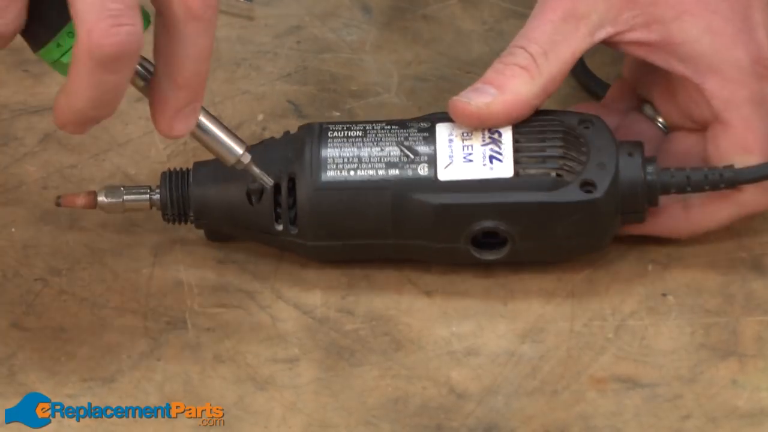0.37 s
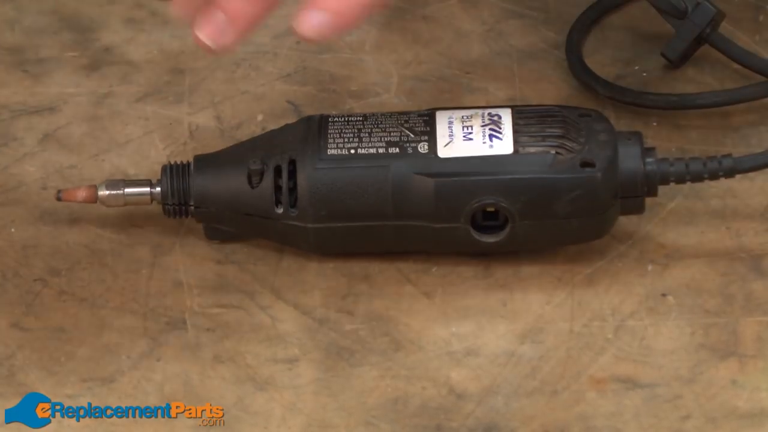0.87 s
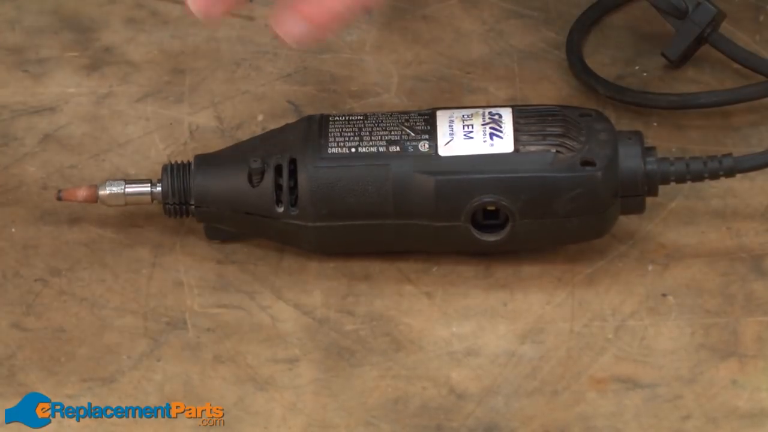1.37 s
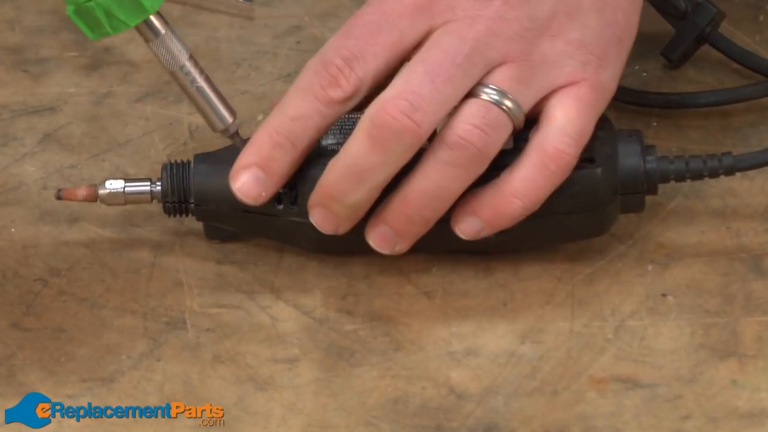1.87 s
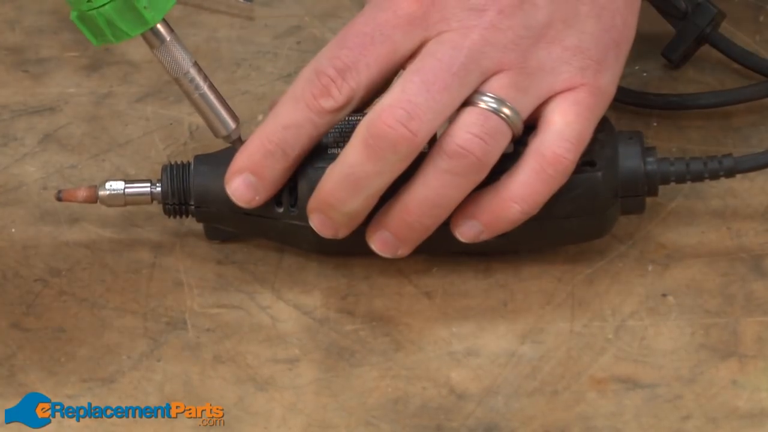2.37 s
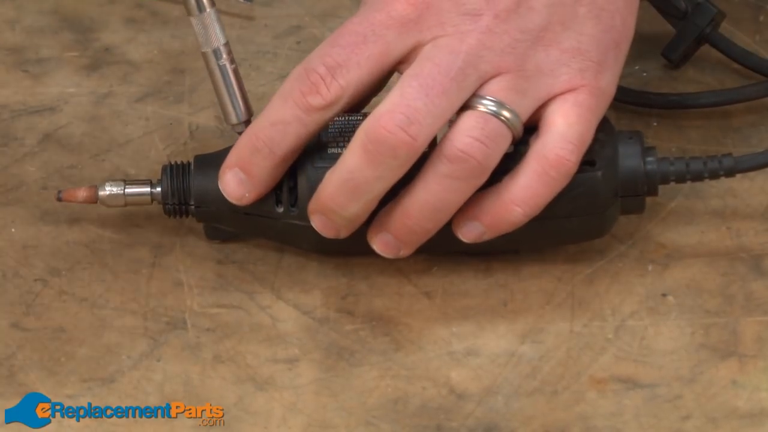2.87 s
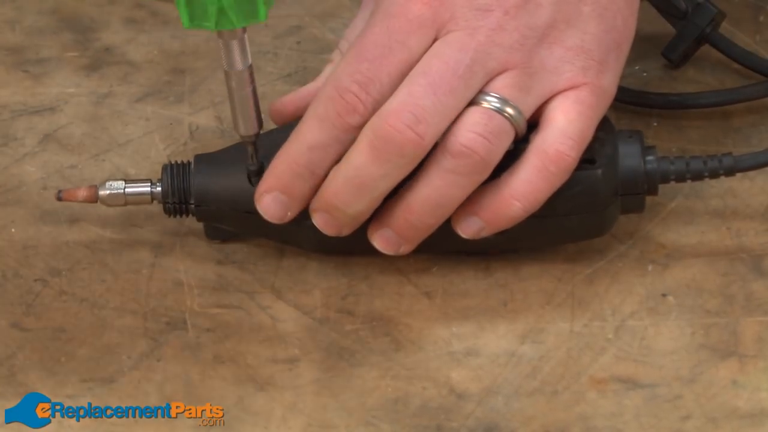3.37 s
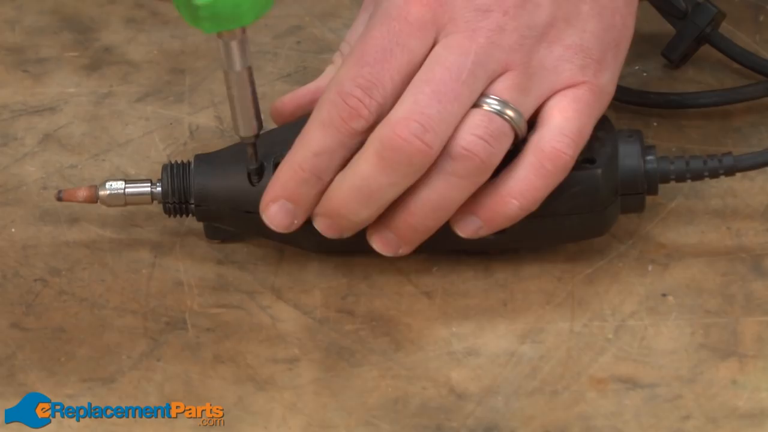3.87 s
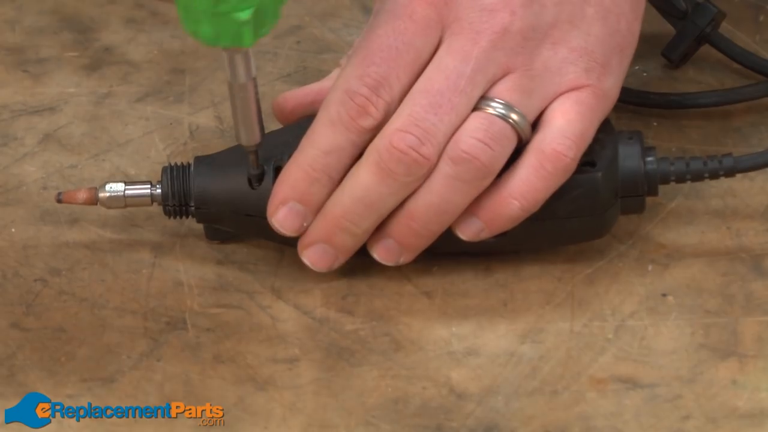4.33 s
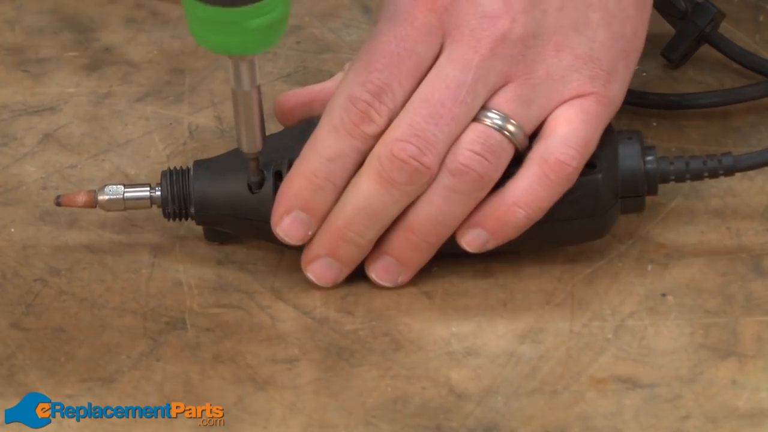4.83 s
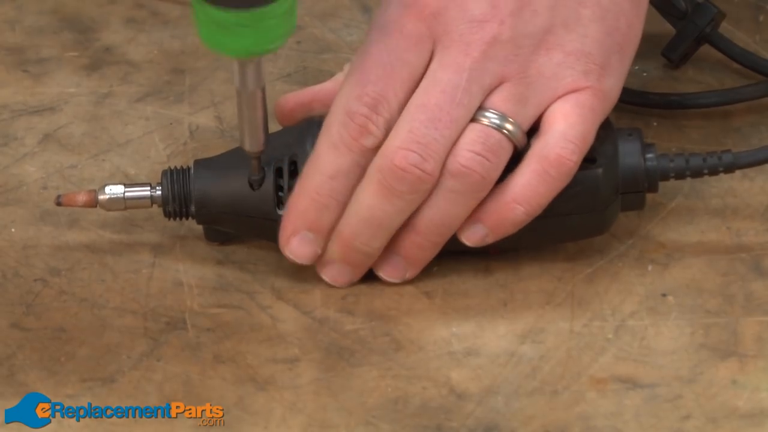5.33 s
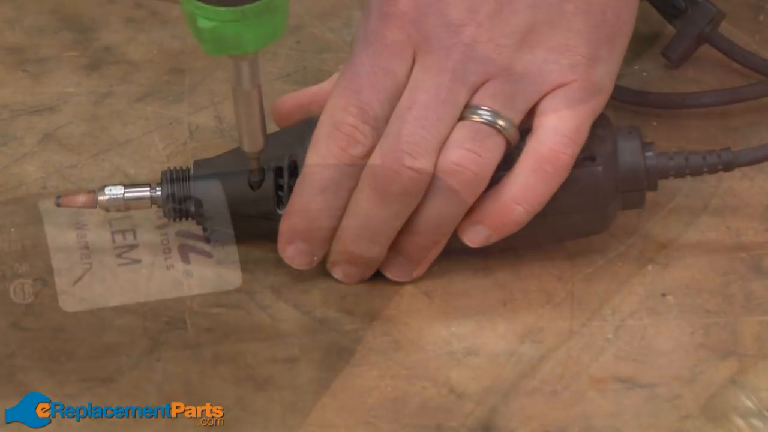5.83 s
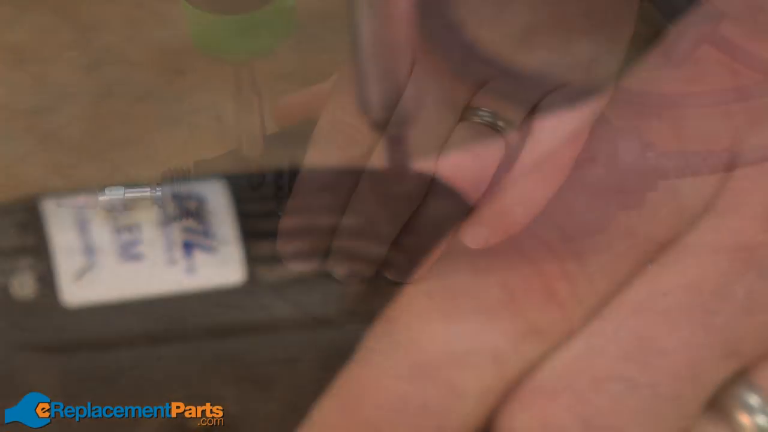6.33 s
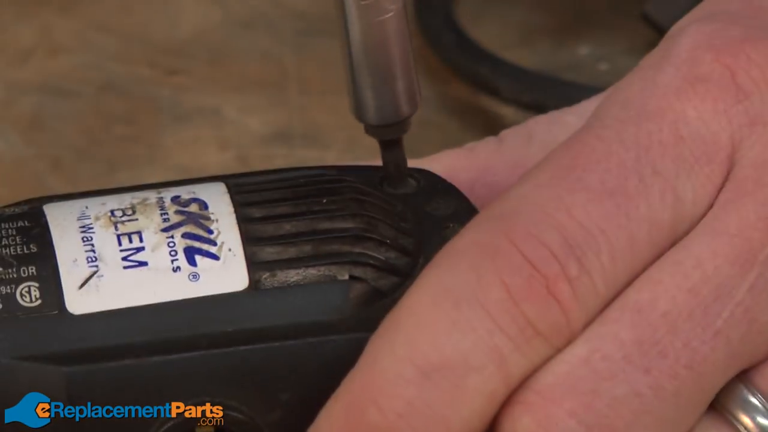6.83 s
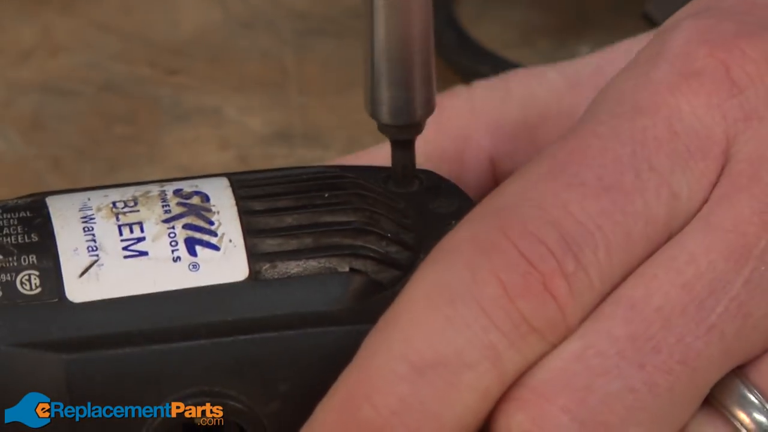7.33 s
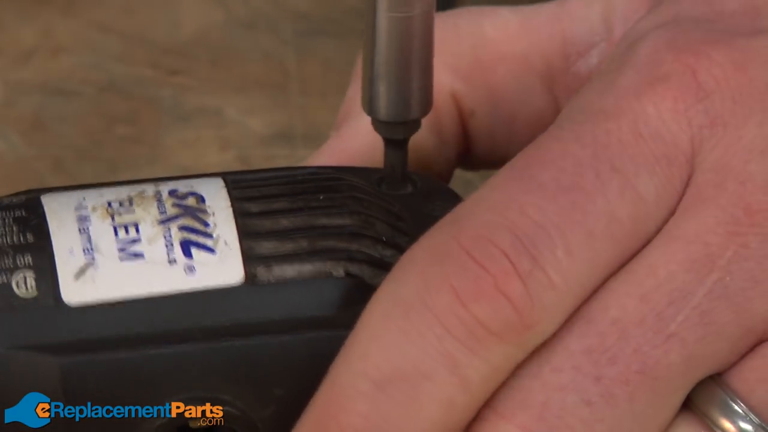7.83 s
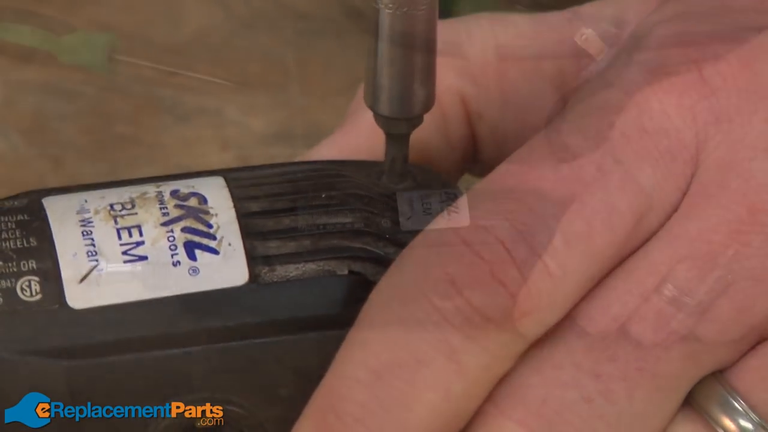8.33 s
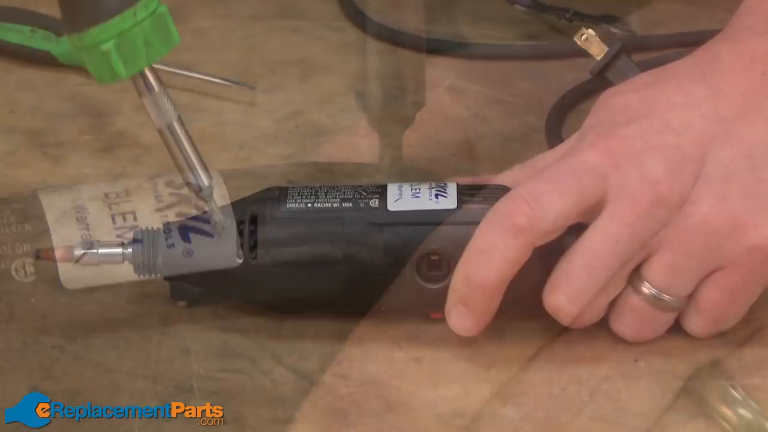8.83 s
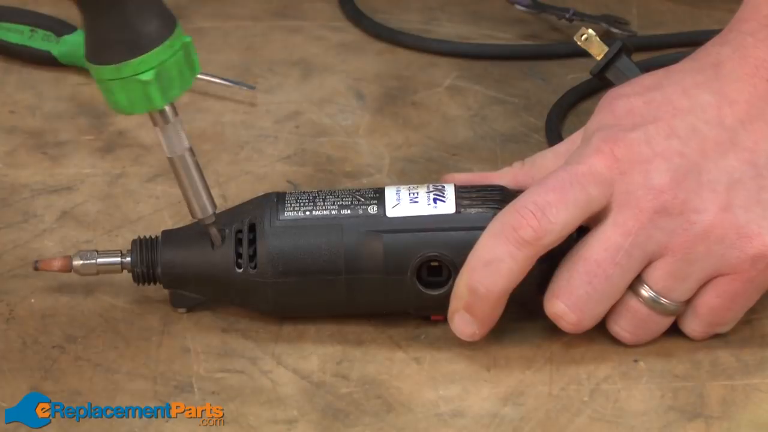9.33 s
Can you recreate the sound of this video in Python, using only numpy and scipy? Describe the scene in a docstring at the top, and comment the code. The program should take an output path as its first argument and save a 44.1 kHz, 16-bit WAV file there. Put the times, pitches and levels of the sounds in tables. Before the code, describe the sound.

Quiet handling of a plastic tool on a hollow bench, then a hand screwdriver ticking, rubbing and thudding in short wrist turns.

```python
"""Faint creaks and a few low thumps over mains hum and hiss, then, from about four seconds, busy screwdriving.
A hand screwdriver turns small screws into a plastic tool housing on a hollow workbench in a small room.
Blows ring decaying modes of bit, shell or bench top; rubbing and scraping are dense grains of such blows.
Creaks are stick-slip noise bursts, the room is sparse echoes; a single microphone hears it all."""
import sys
import numpy as np
from scipy import signal
from scipy.fft import rfft, irfft
from scipy.io import wavfile
from scipy.ndimage import uniform_filter1d

SR = 44100
rng = np.random.default_rng(int(sys.argv[2]) if len(sys.argv) > 2 else 0)


def unload_audio(sound):
    """Save the sound as a 16-bit wav file, at the path given as the first command line argument."""
    columns = np.transpose(np.atleast_2d(sound))
    # keep every value between -1 and 1, then stretch to whole-number steps
    steps = np.round(np.clip(columns, -1, 1) * 32767)
    wavfile.write(sys.argv[1], SR, steps.astype(np.int16))


def volts_from_db(level):
    """Convert decibel levels to linear amplitude ratios."""
    exponent = np.asarray(level, float) / 20
    return 10 ** exponent


N = 426888

# Modes of the hollow bench top. Each row: frequency in Hz, level in dB, t60 in seconds.
BENCH_MODES = [(92.8, -14, 0.4), (128.1, 2.5, 0.084), (149.96, -12.5, 0.41), (194.3, -11.5, 0.18),
               (246.7, -1, 0.062), (275.7, -12.5, 0.096), (371.7, -10, 0.12), (455.4, -17.5, 0.35),
               (512.7, -13, 0.071), (694.8, -14, 0.15)]
# Modes of the plastic housing. Each row: frequency in Hz, level in dB, t60 in seconds.
SHELL_MODES = [(775, -13, .012), (946, -6, 0.014), (1215, 16, 0.006), (1618, 15.5, 0.0051),
               (1840, -1.5, 0.029), (2138, 8, 0.015), (2527, 6.5, 0.017), (2798, 1.5, 0.024),
               (3230, -4.5, 0.02)]
# Modes of the steel bit. Each row: frequency in Hz, level in dB, t60 in seconds.
BIT_MODES = [(4040, 0, 0.0088), (4870, 13, 0.0018), (5990, 10.5, 0.003), (7110, 5, 0.0065),
             (8640, -0.5, 0.0073), (9600, -11, 0.009), (10900, -7, 0.009), (14300, -60, 0.0013)]
# Where both hisses break off at the top. The row: frequency in Hz, level in dB.
HISS_EDGE = [(13700 * 1.01, -90)]


def evened(x):
    """Scales to rms 1."""
    return x / np.sqrt(np.mean(x ** 2) + 1e-20)


def read(points, hz):
    """Reads a table on a log-frequency axis."""
    f, value = np.transpose(points)
    return np.interp(np.log(hz + 1), np.log(f + 1), value)


def add(mix, s, sound):
    """Mixes a sound in at a time in seconds."""
    part = mix[round(s * SR):][:len(sound)]
    part += sound[:len(part)]


def colour(x, points):
    """Filters by a spectrum table of Hz and dB."""
    gain = volts_from_db(read(points, np.fft.rfftfreq(len(x), 1 / SR)))
    return irfft(rfft(x) * gain, len(x))


def ring(modes, seconds, near_hz, reach, contact_s, chatter):
    """A touch and short chatter ring the modes nearest a pitch (reach in octaves); peak 1."""
    # each mode is a cluster of three close ones
    hz, db, t60 = np.repeat(modes, 3, axis=0).T[:, :, None]
    t = np.arange(round(seconds * SR)) / SR
    db = db - 6 * (np.log2(hz / near_hz) / reach) ** 2
    grip = 1 + .04 * rng.standard_normal(hz.shape)  # the changing grip shifts each mode a little
    decaying = volts_from_db(db - 60 * t / t60) * np.sin(2 * np.pi * hz * grip * t)
    rise = 1 - np.exp(-t * near_hz * 1.13)  # the force builds over about a cycle
    contact = chatter * np.exp(-t[:1024] / contact_s) * rng.standard_normal(1024)
    contact[0] = 1  # the first touch
    sound = signal.fftconvolve(rise * decaying.sum(0), contact)[:len(t)]
    return sound / abs(sound).max()


def grains(modes, near_hz, reach, per_s, spread_db, contact_s, seconds, count=8):
    """Dense random contacts of uneven size, each kind ringing the modes its own way; rms 1."""
    happens = rng.random(N) < per_s / SR
    size = volts_from_db(spread_db * np.minimum(rng.exponential(1, N), 4)) * happens
    kind = rng.integers(0, count, N)
    out = np.zeros(N)
    for k in range(count):
        blow = ring(modes, seconds, near_hz, reach, contact_s, 0.5)
        out += signal.oaconvolve(size * (kind == k), blow)[:N]
    return evened(out)


def ticks():
    """The bit meets a screw head: millisecond steel clicks that also stir the shell."""
    # Each row: start in seconds, peak of the steel click in dB, brightest pitch in Hz.
    head_hits = [(0.2783, -43.5, 7000), (1.1328, -44.5, 7290), (2.8646, -39, 6330), (3.525, -43.5, 4730),
                 (3.7088, -39.5, 5830), (3.9657, -39.5, 6240), (4.0706, -37, 5550), (4.2265, -47, 5760),
                 (4.2562, -35, 6100), (4.2893, -22, 6700), (4.326, -35, 4640), (4.418, -34.5, 6400),
                 (4.4458, -35, 7020), (4.4577, -31, 5830), (4.4926, -31.5, 5500), (4.541, -37.5, 6800),
                 (4.6206, -32.5, 6970), (4.633, -32, 7250), (4.6879, -34, 4500), (4.6929, -33, 4670),
                 (4.792, -26.5, 6700), (4.8418, -32.5, 5860), (4.8631, -31, 6800), (4.9033, -30, 6400),
                 (4.9454, -29.5, 7100), (4.9832, -24.5, 7600), (4.989, -28, 7800), (5.058, -31, 6900),
                 (5.1018, -25, 7800), (5.1155, -25, 6400), (5.1409, -20, 6600), (5.1981, -41, 5900),
                 (5.2316, -32, 7100), (5.2902, -30.5, 6740), (5.3264, -36.5, 4540), (5.3349, -38, 7000),
                 (5.3895, -31, 7500), (5.3931, -27.5, 6300), (5.4284, -23.5, 5710), (5.4366, -26, 7560),
                 (5.573, -46, 6100), (5.622, -45, 4580), (5.67, -37, 5770), (5.6772, -35.5, 6270),
                 (5.7013, -32.5, 6650), (5.7142, -34, 7050), (5.77, -42, 6150), (5.8186, -37, 6900),
                 (5.8733, -37.5, 7290), (5.9579, -48, 5960), (6.0437, -33.5, 7700), (6.0821, -27.5, 7550),
                 (6.155, -34, 7400), (6.1969, -31, 5000), (6.239, -40, 7340), (6.246, -34, 7200),
                 (6.301, -39, 6100), (6.315, -40, 6660), (6.3858, -34, 5630), (6.4908, -38.5, 7300),
                 (6.5292, -37.5, 5000), (6.6932, -29.5, 4500), (6.7034, -38, 8170), (6.7232, -31, 5400),
                 (6.7456, -39, 7000), (6.7865, -42, 4820), (6.7964, -36, 5700), (6.994, -37, 7300),
                 (7.0175, -32.5, 5300), (7.0268, -31, 4870), (7.0494, -26.5, 5900), (7.0696, -24, 7200),
                 (7.083, -27, 6740), (7.092, -33, 6000), (7.1165, -26, 7700), (7.2763, -33.5, 6900),
                 (7.3383, -32, 5200), (7.3727, -33, 7450), (7.519, -34, 5070), (7.5948, -39.5, 7360),
                 (7.6136, -42, 7540), (7.8182, -34, 7500), (7.9343, -35, 6600), (8.6158, -43, 10500),
                 (9.109, -41, 5990), (9.317, -23, 9150), (9.5214, -38, 8750), (9.5836, -38, 9000)]
    out = np.zeros(N)
    for s, db, hz in head_hits:
        add(out, s, volts_from_db(db) * ring(BIT_MODES, .024, hz, .45, .0003, .3))
        add(out, s, volts_from_db(db - 12) * ring(SHELL_MODES, .024, 2860, 0.79, 0.00042, 0.27))
    return out


def knocks():
    """The bit or a finger knocks the shell: a duller, longer ring near one pitch, with a broad thud."""
    # Each row: start in seconds, peak of the ring in dB, strongest pitch in Hz.
    shell_hits = [(0.32, -46, 1460), (1.434, -49.5, 1170), (1.46, -66, 1360), (2.042, -51.5, 1330),
                  (2.921, -46.5, 1260), (2.925, -55, 2310), (3.027, -55, 1980), (3.076, -60, 2140),
                  (3.163, -56, 1310), (3.508, -43, 1300), (3.522, -33.5, 1180), (4.0043, -42, 1500),
                  (4.3273, -40, 2480), (4.6325, -41, 2680), (4.6925, -39, 3230), (4.877, -55, 3540),
                  (4.9515, -52, 1150), (5.063, -51, 1290), (5.2525, -51, 1180), (5.3348, -50, 1260),
                  (5.7432, -38, 3250), (6.0434, -30, 2950), (6.3547, -27.5, 2890), (6.4691, -50, 2500),
                  (6.6278, -49.5, 2330), (6.665, -51, 1960), (6.6931, -35, 2420), (6.7224, -25, 3550),
                  (6.7335, -26.5, 2920), (6.7537, -29.5, 1770), (7.0261, -53, 1490), (7.0513, -23, 3320),
                  (7.0563, -26, 2760), (7.0923, -24, 3380), (7.331, -43.5, 2420), (7.3632, -40.5, 2860),
                  (7.4863, -54, 2720), (7.5132, -35.5, 2260), (7.5265, -39.5, 1500), (8.0184, -44, 1000),
                  (8.439, -45.5, 1010), (8.6463, -28.5, 2430), (9.0255, -45, 1800), (9.082, -47.5, 1710),
                  (9.1073, -47, 1880), (9.2218, -46.5, 2070), (9.5222, -39, 1650), (9.5843, -41.5, 2300)]
    # Dull noise of a knock at 2500 Hz. Each row: frequency in Hz, level in dB per Hz.
    thud_colour = [(250, -27), (600, 3.5), (1500, -0.5), (3200, -11.5), (5000, -12.5), (12000, -33)]
    thud_db, growth = -52, 0.98  # level under a -35 dB knock, and dB gained per dB of blow
    out, t = np.zeros(N), np.arange(round(.12 * SR)) / SR
    for s, db, hz in shell_hits:
        add(out, s, volts_from_db(db) * ring(SHELL_MODES, .06, hz, .25, 0.0018, 0.15))
        moved = [(f * (hz / 2500) ** 0.14, g) for f, g in thud_colour]  # moves with the pitch
        thud = evened(colour(rng.standard_normal(len(t)), moved))
        thud = thud * volts_from_db(-60 * t / 0.13)  # t60 in s
        add(out, s, volts_from_db(thud_db + growth * (db + 35)) * thud)
    return out


def thumps():
    """The housing knocks the bench: a soft push rings the top; a high-pass keeps the deepest bass lean."""
    # Each row: start in seconds, peak in dB ahead of the bass filters, strongest pitch in Hz.
    bench_hits = [(0.073, -50, 110), (0.126, -37, 127), (0.316, -19.5, 143), (0.359, -28.5, 159),
                  (2.04, -32, 126), (2.98, -38, 99), (3.026, -30.5, 112), (3.154, -36.5, 118),
                  (3.507, -33, 167), (3.516, -16.5, 111), (3.729, -40, 117), (3.998, -34, 94),
                  (4.184, -40, 127), (4.302, -34.5, 140), (4.435, -33.5, 100), (4.599, -32, 91),
                  (4.827, -29.5, 122), (4.909, -33.5, 267), (5.064, -30.5, 118), (5.25, -35, 260),
                  (5.425, -26, 131), (5.581, -35.5, 127), (5.674, -30, 133), (5.901, -29.5, 130),
                  (6.044, -29, 118), (6.07, -14.5, 122), (6.259, -35.5, 134), (6.386, -14, 127),
                  (6.471, -24.5, 141), (6.722, -19.5, 123), (6.76, -10.5, 150), (7.05, -14, 129),
                  (7.095, -8, 147), (7.17, -44, 148), (7.296, -24, 137), (7.516, -27.5, 276),
                  (7.681, -29, 145), (7.728, -23.5, 145), (8.034, -23, 145), (8.074, -22.5, 133),
                  (8.325, -38, 143), (8.454, -39.5, 137), (8.647, -29.5, 111), (9.031, -34.5, 237),
                  (9.104, -28, 157), (9.315, -27.5, 98), (9.52, -26, 118)]
    out, t = np.zeros(N), np.arange(round(.4 * SR)) / SR
    hz, db, t60 = np.transpose(BENCH_MODES)[:, :, None]
    push = np.hanning(round(0.0016 * SR))
    for s, peak_db, near_hz in bench_hits:
        # each landing spot weighs and tunes the modes anew
        weight_spot, pitch_spot = rng.standard_normal((2, len(BENCH_MODES), 1))
        weight_db = db + 3.4 * weight_spot - 6 * (np.log2(hz / near_hz) / 1.46) ** 2
        decaying = volts_from_db(weight_db - 60 * t / t60) * np.sin(2 * np.pi * hz * (1 + 0.017 * pitch_spot) * t)
        boom = np.convolve(decaying.sum(0), push)
        add(out, s, volts_from_db(peak_db) * boom / abs(boom).max())
    sway = signal.sosfilt(signal.butter(2, 50, "low", fs=SR, output="sos"), out)
    lean = signal.sosfilt(signal.butter(4, 88, "high", fs=SR, output="sos"), out)
    return lean + volts_from_db(-20) * sway  # the bench legs sway under a thump


def turns():
    """Turns of the wrist: returns the rubbing and scraping gains and how far each turn is engaged."""
    # Each row: start in seconds, length in seconds, rubbing on the shell in dB,
    # steel scraping in dB above or below the rubbing.
    twists = [(3.967, 0.18, -68, 8), (4.16, 0.37, -63, 5), (4.415, 0.15, -59, 1), (4.565, 0.2, -58, -5),
              (4.793, 0.3, -61, -5), (5.05, 0.3, -59, -11), (5.238, 0.31, -63, -1),
              (5.368, 0.21, -59, 10.5), (5.537, 0.56, -62, 0.5), (5.89, 0.37, -65.5, 3.5),
              (6.054, 0.078, -53.5, 0), (6.148, 0.32, -63, 5.5), (6.329, 0.27, -58, -13),
              (6.688, 0.21, -56, 4), (6.969, .065, -61, -3), (7.036, .13, -50, -13),
              (7.3, 0.066, -62.5, 6.5), (7.511, 0.048, -58, -6), (7.655, 0.48, -75, -20),
              (8.024, 0.19, -61.5, 2.5), (8.355, 0.1, -57, -4), (9.024, 0.12, -82.5, 12.5),
              (9.301, .12, -59, -8), (9.476, 0.31, -72, -3)]
    skew = 0.57  # under 1: a turn bites early and eases off slowly
    rub_power, scrape_power, turning = np.zeros(N), np.zeros(N), np.zeros(N)
    for s, length, db, steel_db in twists:
        arch = np.sin(np.pi * np.linspace(0, 1, round(length * SR)) ** skew) ** 2
        add(rub_power, s, volts_from_db(2 * db) * arch)
        add(scrape_power, s, volts_from_db(2 * (db + steel_db)) * arch)
        add(turning, s, arch)
    return np.sqrt(rub_power), np.sqrt(scrape_power), turning


def friction(rub_gain, scrape_gain):
    """Each turn rubs the shell and scrapes the bit, as dense small contacts."""
    rub = grains(SHELL_MODES, 3000, 3.3, 900, 5, 0.0014, .04)
    scrape = grains(BIT_MODES, 5750, .8, 200, 8.6, 0.00047, .024)
    return rub_gain * rub + scrape_gain * scrape


def bench_chatter(turning):
    """The free hand leaning on the tool sets the bench chattering, harder within a turn."""
    # Each row: time in seconds, bench shaking in dB outside the turns.
    leaning = [(0, -63), (.3, -59), (.5, -79), (2.6, -77), (3.0, -72), (3.9, -60), (4.3, -51), (5.9, -53),
               (6.4, -49.5), (7.2, -51), (7.75, -49.5), (8.2, -62), (8.65, -51.5), (8.95, -75),
               (9.1, -48.5), (9.68, -58)]
    lean_db = np.interp(np.arange(N) / SR, *np.transpose(leaning))
    shake = grains(BENCH_MODES, 149, 1.41, 28, 3, 0.00069, .3)
    return volts_from_db(lean_db + 5 * turning) * shake


def creaks():
    """Stick and slip: uneven noise bursts, faster as the motion gains speed, merging into a rustle."""
    # Skin, cord or tight threads slipping. Each row: start in seconds, length in seconds,
    # top level in dB, top rate in slips per second, brightest pitch in Hz.
    slips = [(0, 0.022, -56.5, 540, 2500), (1.736, 0.04, -74, 500, 2000), (0.031, 0.37, -66, 470, 2400),
             (0.919, 0.17, -68, 560, 4600), (1.002, 0.024, -52, 253, 3350), (1.138, 0.024, -56, 274, 4520),
             (1.164, 0.015, -49, 240, 7000), (1.292, 0.15, -66.5, 500, 6840),
             (1.431, 0.085, -59, 106, 2600), (7.634, .155, -45, 260, 4700), (8.025, .075, -36.5, 390, 5600),
             (8.356, 0.064, -54, 103, 7200), (9.309, 0.037, -48, 440, 8900)]
    # Colour of the slip noise. Each row: frequency in Hz, level in dB.
    slip_colour = [(290, -3), (500, 15), (1700, 10.5), (2160, 7), (2720, 5.5), (4640, -1), (11300, 10),
                   (15500, 7)]
    ends_db, slowing = -16, 0.95  # a slip swells and sinks; its rate follows this share of the dB
    out = np.zeros(N)
    for s, length, top_db, top_per_s, bright_hz in slips:
        swell_db = ends_db * abs(np.linspace(-1, 1, round(length * SR))) ** 2.6
        per_s = top_per_s * volts_from_db(slowing * swell_db)
        n = len(per_s)
        wobble = 1 + .25 * evened(uniform_filter1d(rng.standard_normal(n), 200))
        since = (np.cumsum(per_s * wobble) / SR % 1) / per_s  # seconds since the last slip
        burst = (np.exp(-since / 0.0018) + 0.022) * rng.standard_normal(n)
        hz, _, z = signal.stft(colour(burst, slip_colour), SR, nperseg=128)
        octaves = np.log2((hz[:, None] + 1) / bright_hz)
        z = z * volts_from_db(np.where(octaves > 0, -6.5, -1.4) * octaves ** 2)  # falls fast above the brightest pitch
        burst = signal.istft(z, SR, nperseg=128)[1][:n]
        add(out, s, volts_from_db(top_db + swell_db) * evened(burst))
    return out


def whispers():
    """A faint narrow band of hiss that swells and fades."""
    # Each row: start in seconds, length in seconds, level in dB.
    swells = [(5.85, 0.82, -68), (9.33, 0.42, -75)]
    centre_hz = 4820
    out = np.zeros(N)
    for s, length, db in swells:
        n = round(length * SR)
        shape = [(centre_hz * 0.57, -30), (centre_hz, 0), (centre_hz * 1.44, -30)]
        band = evened(colour(rng.standard_normal(n), shape))
        add(out, s, volts_from_db(db) * np.sqrt(np.hanning(n)) * band)
    return out


def room(x, count=3):
    """A small room: sparse taps of random sign, each band dying at its own speed."""
    # Each row: frequency in Hz, t60 in seconds.
    decay = [(100, 0.22), (500, 0.53), (2500, 0.32), (9000, 0.24)]
    at, out = np.arange(200, SR // 2 - 20, 20), np.zeros(N)
    for k in range(count):
        taps = np.zeros(SR // 2)
        taps[at + rng.integers(0, 20, len(at))] = rng.choice([-1., 1.], len(at))
        hz, t, z = signal.stft(taps, SR, nperseg=256)
        tail = signal.istft(z * volts_from_db(-60 * t / read(decay, hz)[:, None]), SR, nperseg=256)[1]
        # the sound passes steadily round three echo patterns, so no one pattern colours the tail
        share = np.sqrt(2 / count) * np.cos(np.pi * (7 * np.arange(N) / SR + k / count))
        out += signal.oaconvolve(x * share, tail / np.linalg.norm(tail))[:N]
    return out


def hum():
    """Multiples of the mains frequency, slowly wavering in level."""
    # Each row: frequency in Hz, level in dB rms about which it wavers.
    partials = [(60, -99), (120, -59.5), (240, -75), (360, -74.5), (480, -86), (600, -95.5)]
    t, out = np.arange(N) / SR, np.zeros(N)
    waver = evened(uniform_filter1d(rng.standard_normal((N, len(partials))), 8000, 0)).T
    for (hz, db), w in zip(partials, waver):
        tone = np.sqrt(2) * np.sin(2 * np.pi * (hz * t + rng.random()))
        out += volts_from_db(db + 0.93 * w) * tone
    return out


def air():
    """Steady background noise, strongest in the bass, at -62.5 dB rms."""
    # Each row: frequency in Hz, relative level in dB.
    floor_colour = [(12, -63), (20, 5), (70, -7), (121, -7.5), (146, -8), (172, -13.5), (239, -4.5),
                    (297, -22), (360, -16.5), (412, -19.5), (655, -27), (13500, -36)]
    return volts_from_db(-62.5) * evened(colour(rng.standard_normal(N), floor_colour + HISS_EDGE))


def side_hiss():
    """A trace of hiss in opposite polarity on the two channels, at -79.5 dB rms."""
    shape = [(20, 10.3), (300, 0.5), (13500, 5.4)] + HISS_EDGE  # Hz, relative dB
    return volts_from_db(-79.5) * evened(colour(rng.standard_normal(N), shape))


def scene():
    """Everything reaches one microphone; the two channels differ only by a trace of hiss and gain."""
    rub_gain, scrape_gain, turning = turns()
    steel, shell = ticks(), knocks()
    sharp = creaks() + whispers() + friction(rub_gain, scrape_gain)
    low = thumps() + bench_chatter(turning)
    # knocks fill the room more than ticks
    to_room = volts_from_db(-7.5) * shell + volts_from_db(-12) * steel + volts_from_db(-12) * sharp + volts_from_db(-6) * low
    mono = steel + sharp + shell + low + room(to_room) + hum() + air()
    side = side_hiss() - volts_from_db(-52) * mono  # the right channel is a hair louder
    return np.array([mono + side, mono - side])


def top_cut(x):
    """Nothing passes above the cut-off."""
    return signal.sosfilt(signal.butter(12, 15680, fs=SR, output="sos"), x)


def record(dry):
    """Hands on the finished mix."""
    return top_cut(dry)


dry = scene()
out = record(dry)
unload_audio(out)
```